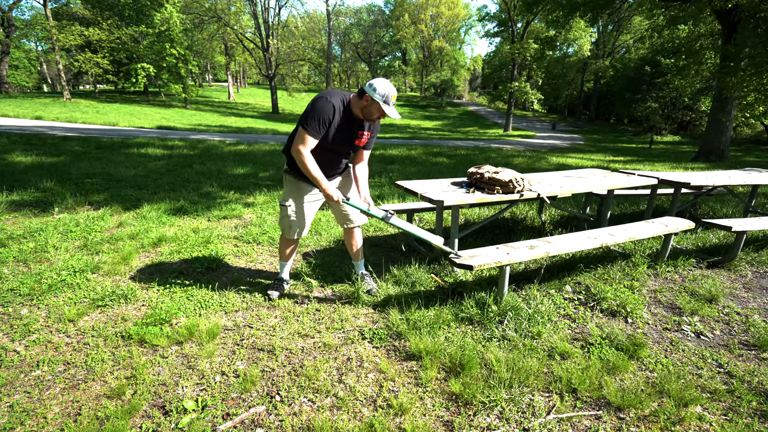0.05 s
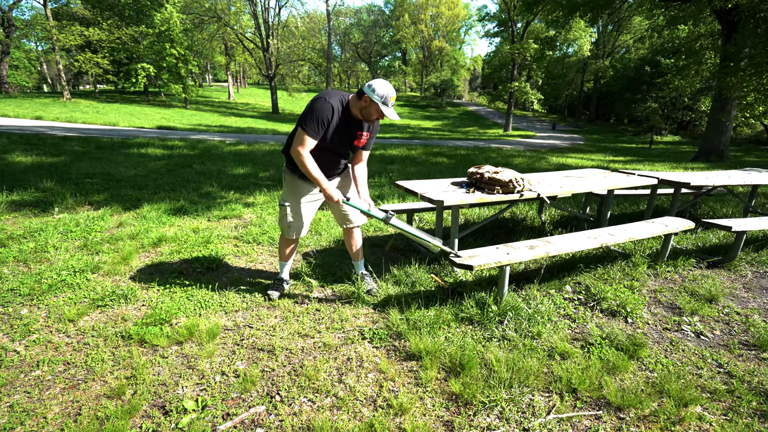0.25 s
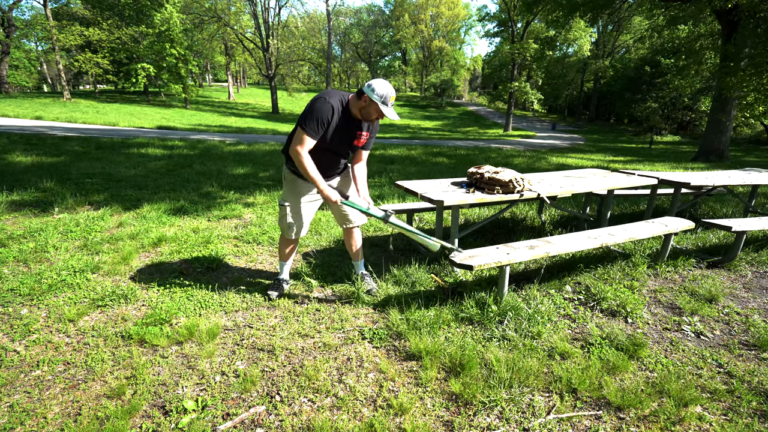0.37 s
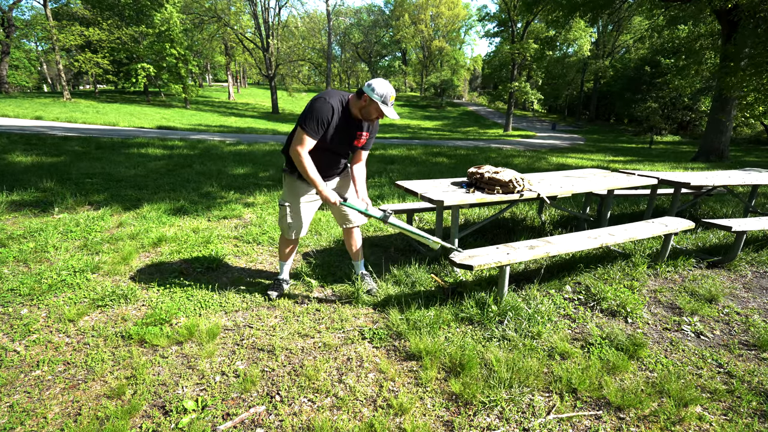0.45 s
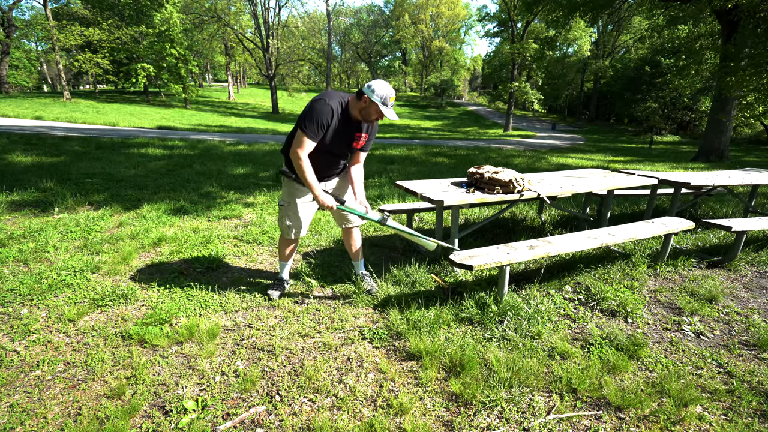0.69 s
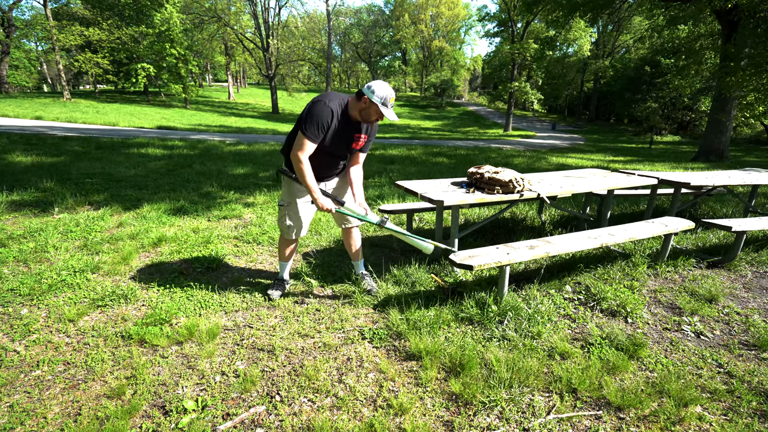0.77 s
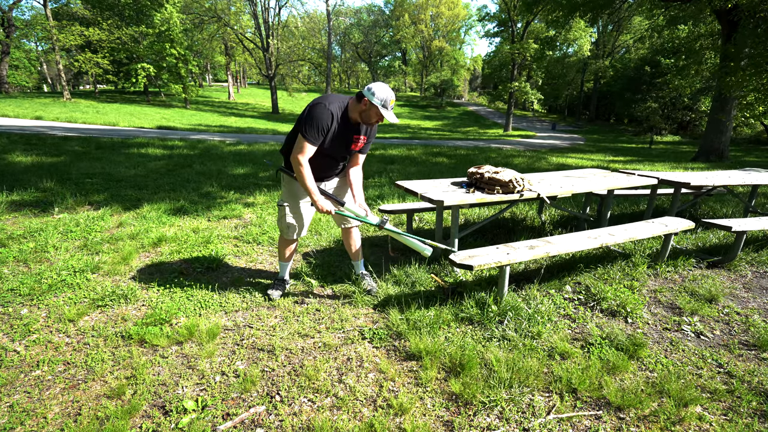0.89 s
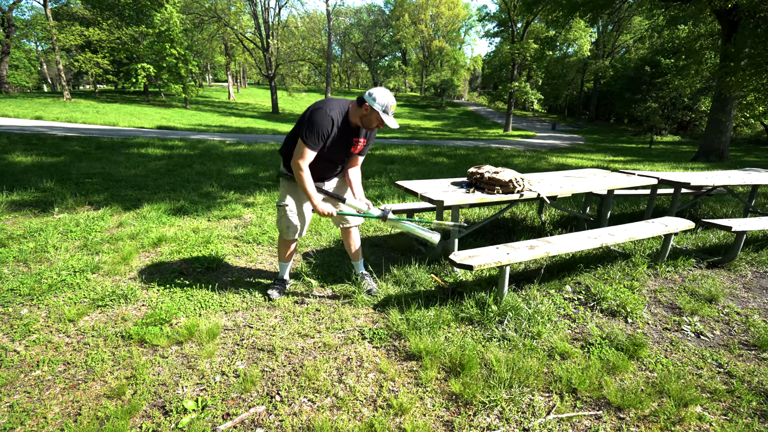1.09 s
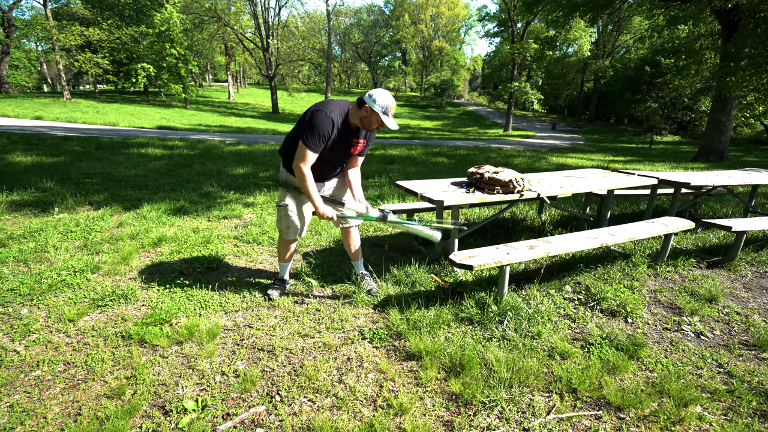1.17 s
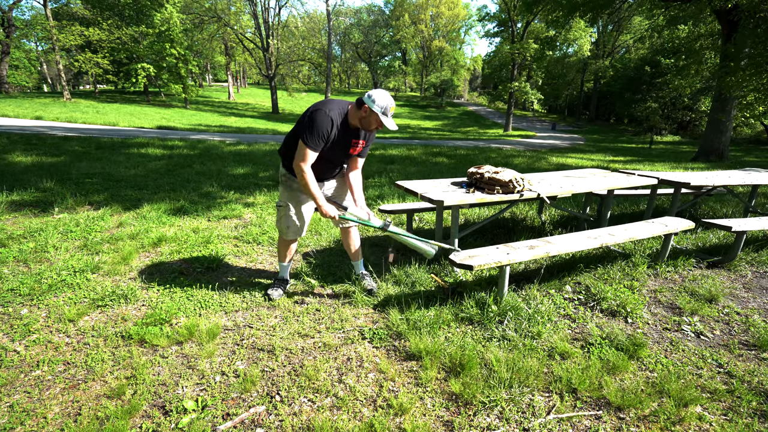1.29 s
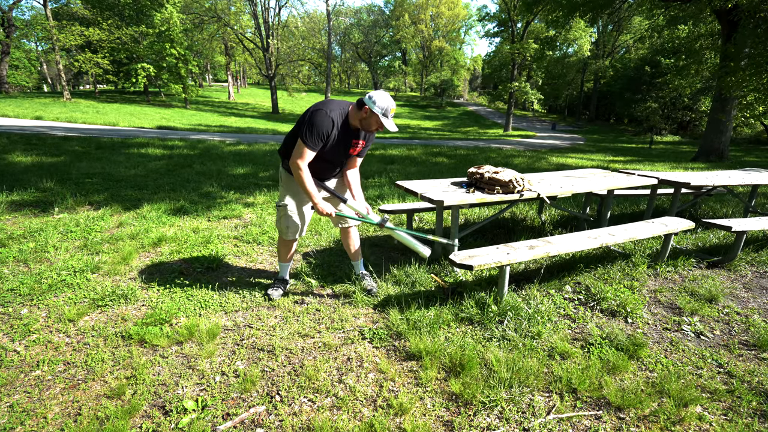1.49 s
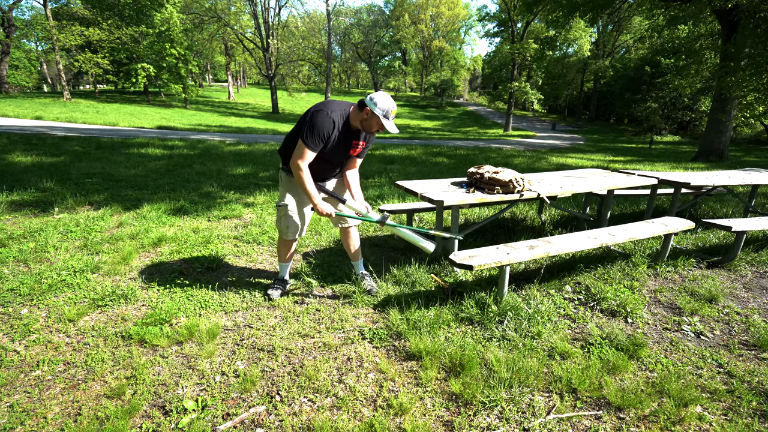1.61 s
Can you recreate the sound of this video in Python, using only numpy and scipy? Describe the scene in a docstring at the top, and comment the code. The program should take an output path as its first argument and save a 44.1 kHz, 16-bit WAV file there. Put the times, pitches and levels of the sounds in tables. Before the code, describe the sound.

Hollow pole sections slide and knock home outdoors, three bright clacks each with a short hollow note, then small ticks and one dull knock, heard from a few metres away with low distant traffic and slight scatter from the trees.

```python
"""Telescoping pole in a quiet park

A telescoping pole is collapsed by hand, a few metres from the microphone, over distant traffic rumble.
Hollow sections scrape, rattle and faintly rustle (dense noise grains) and knock home: decaying wall modes
clack with a burst of noise, then slower-swelling modes of the air in the tube give a short hollow note.
Three knocks are sharp, the last dull; loose sections tick (filtered noise), and the park scatters it all."""
import sys
import numpy as np
from scipy import signal
from scipy.fft import rfft, irfft
from scipy.io import wavfile

SR = 44100
rng = np.random.default_rng(int(sys.argv[2]) if len(sys.argv) > 2 else 0)


def master(y):
    """Save y as 16-bit WAV."""
    cut = np.clip(np.atleast_2d(y).T, -1, 1)
    pcm = np.round(cut * 32767)  # scale
    wavfile.write(sys.argv[1], SR, pcm.astype(np.int16))


N = 72765  # length in samples


def from_db(db):
    """Decibels to gain."""
    return 10 ** (np.asarray(db) / 20)


def rms_one(x):
    """Scale to unit rms."""
    return x / np.sqrt(np.mean(x ** 2) + 1e-20)


def coloured(x, spectrum):
    """Shape noise by a spectrum, interpolated in dB over log frequency; rms 1."""
    hz, db = np.transpose(spectrum)
    bins = np.maximum(np.arange(len(x) // 2 + 1) * SR / len(x), 1)
    gain = from_db(np.interp(np.log(bins), np.log(hz), db))
    return rms_one(irfft(rfft(x) * gain, len(x)))


def low_pass(x, hz):
    """A softer contact loses its treble, by a gentle first-order slope."""
    return signal.sosfilt(signal.butter(1, hz, fs=SR, output="sos"), x)


def add(out, start_s, sound):
    """Mix a sound in at a time."""
    i = int(start_s * SR)
    out[i:i + len(sound)] += sound[:len(out) - i]


def burst(t, spectrum, t60):
    """A brief noise of a given colour that dies away by 60 dB in t60 seconds."""
    noise = coloured(rng.standard_normal(len(t)), spectrum)
    return noise * from_db(-60 * t / t60)


# The park with its distant traffic. Each row: frequency in Hz, level in dB.
PARK_SPECTRUM = [(20, -7), (35, -8.5), (60, -4.5), (96, -1), (127, -7.5), (200, -8.5), (290, -18),
                 (450, -21), (800, -19), (1100, -24.5), (1700, -33), (3200, -41.5), (5000, -47.5),
                 (8700, -48), (11000, -53), (14000, -51.5), (16000, -53)]
PARK_DB = -47


def park_background():
    """Distant traffic rumbles: steady noise, weighted to the bass."""
    return from_db(PARK_DB) * coloured(rng.standard_normal(N), PARK_SPECTRUM)


# Touches of the loose sections. Each row: start in seconds, level in dB, treble cut-off in Hz.
TICKS = [(0.142, -51, 6000), (0.3194, -51.5, 9000), (0.453, -41.5, 8000), (0.7952, -34, 1800),
         (0.8168, -39, 7000), (0.8705, -52.5, 8900), (0.8983, -46.5, 9400), (1.034, -55.5, 6000),
         (1.085, -49, 17000), (1.2018, -55, 8000), (1.215, -58, 8000), (1.225, -56, 7900),
         (1.235, -57, 8000), (1.3368, -42, 6850)]
# Colour of a tick before its cut-off. Each row: frequency in Hz, level in dB.
TICK_SPECTRUM = [(60, -31.5), (300, -12), (1500, 12), (3500, -4), (5500, 3.5), (9000, 2), (11000, -6.5),
                 (16000, -6)]
TICK_T60_S = 0.031


def ticks():
    """Loose sections touch lightly: each contact is a short noise, softened by its own cut-off."""
    out, t = np.zeros(N), np.arange(SR // 10) / SR
    for start_s, db, cutoff_hz in TICKS:
        tick = low_pass(burst(t, TICK_SPECTRUM, TICK_T60_S), cutoff_hz)
        add(out, start_s, from_db(db) * tick)
    return out


SWELL_SHAPE, MODE_SPREAD_DB = 5.6, 1  # steepness of a mode's build-up, spread of its level between blows


def mode(t, hz, db, t60, swell_s):
    """One resonance builds up and dies away, at a slightly different level at every blow."""
    swell = 1 - np.exp(-(t / swell_s) ** SWELL_SHAPE)
    decay = from_db(db + rng.normal(0, MODE_SPREAD_DB) - 60 * t / t60)
    return swell * decay * np.sin(2 * np.pi * hz * t)


# Resonances of the tube wall. Each row: frequency in Hz, level in dB, t60 in seconds, rise in seconds.
WALL_MODES = [(423, -7.5, 0.008, 0.00078), (1335, -18.5, .039, 0.0017), (1819, -9.5, 0.02, 0.0021),
              (2105, -20.5, 0.027, 0.00017), (2524, -19, 0.022, 0.00057), (2884, -15.5, 0.013, 0.002),
              (3157, -18, 0.025, 0.0008), (3824, -30, .025, 0.00073), (4483, -26, 0.018, 0.00087),
              (5320, -26, .024, 0.0013), (5840, -41.5, 0.046, 0.00085), (6760, -31.5, 0.01, 0.0042),
              (9720, -40, .02, 0.00057), (10170, -39.5, 0.036, 0.0024)]
FOCUS_DB, FOCUS_OCTAVES = 7.5, 0.18  # boost at the pitch that a contact favours, and its width


def wall_clack(t, clack_db, focus_hz):
    """The struck wall rings in many short modes, stronger near the pitch that the contact favours."""
    clack = np.zeros(len(t))
    for k, (hz, db, t60, rise_s) in enumerate(WALL_MODES):
        octaves_away = np.log2(hz / focus_hz)
        boost_db = FOCUS_DB * np.exp(-(octaves_away / FOCUS_OCTAVES) ** 2)
        sign = (-1) ** k  # neighbouring modes start in opposite directions
        clack += sign * mode(t, hz, db + clack_db + boost_db, t60, rise_s)
    return clack


# Resonances of the air in the tube. Each row: frequency in Hz, level in dB while extended,
# level in dB when closed, t60 in seconds, swell in seconds.
AIR_MODES = [(222.3, -31.5, -32.5, 0.12, 0.00091), (285.8, -39.5, -46, .25, 0.0043),
             (398.3, -28, -28, 0.16, .001), (450, -37, -39.5, .11, 0.0011),
             (503, -27, -17.5, 0.083, 0.0068), (591, -12, -56, 0.093, .0033),
             (613, -8, -15.5, 0.083, 0.012), (702.4, 3, -3, 0.055, 0.00957),
             (757.9, -3.5, 2.5, 0.072, 0.011), (1028, -18, -36.5, 0.059, 0.0074),
             (1066, -17, -33, 0.03, 0.0013), (1182.6, -10, -10.5, 0.051, .0046),
             (1246, -21, -19, .1, 0.0025), (1469, -18.5, -20.5, 0.048, 0.0059),
             (1626, -28.5, -22.5, 0.063, 0.0098)]


def hollow_note(t, note_db, closed):
    """The air in the tube swells into a note; its balance of modes shifts as the tube closes."""
    note = np.zeros(len(t))
    for hz, open_db, closed_db, t60, swell_s in AIR_MODES:
        balance_db = open_db + closed * (closed_db - open_db)
        note += mode(t, hz, note_db + balance_db, t60, swell_s)
    return note


# Colour of the crack in a knock. Each row: frequency in Hz, level in dB.
CRACK_SPECTRUM = [(60, -40), (300, -16), (1500, 10.5), (3200, -8.5), (4000, -7), (6000, -8.5), (9000, -9),
                  (11000, -32), (13500, -12), (16000, -29)]
# Colour of the snap, the first instant of contact. Each row: frequency in Hz, level in dB.
SNAP_SPECTRUM = [(60, -46), (3000, 8), (9000, 10), (11000, 3.5), (13500, 9), (16000, 3)]
CRACK_T60_S, SNAP_T60_S = 0.047, 0.011


def snap_and_crack(t, crack_db, snap_db):
    """The contact's own noise: a very short bright snap over a longer crack."""
    crack = from_db(crack_db) * burst(t, CRACK_SPECTRUM, CRACK_T60_S)
    snap = from_db(snap_db) * burst(t, SNAP_SPECTRUM, SNAP_T60_S)
    return crack + snap


# Sections knocking home. Each row: start in seconds, wall clack in dB, hollow note in dB, crack in dB,
# snap in dB, contact cut-off in Hz, favoured pitch in Hz, how far the tube is closed from 0 to 1.
KNOCKS = [(0.2402, -1, -0.5, -21, -23, 12000, 2050, 0.01), (0.4811, 1, 2.24, -22, -26.5, 5500, 2830, 0.09),
          (0.7478, -4.5, -1, -26, -23, 7900, 2970, 0.01), (1.2955, -16, -0.5, -27.5, -40, 3600, 1300, 0.97)]


def knocks():
    """Each section hits its stop; the contact's softness dulls the wall and noise but not the air."""
    out, t = np.zeros(N), np.arange(SR // 4) / SR
    for start_s, wall_db, air_db, crack_db, snap_db, contact_hz, focus_hz, closed in KNOCKS:
        wall = wall_clack(t, wall_db, focus_hz)
        air = hollow_note(t, air_db, closed)
        noise = snap_and_crack(t, crack_db, snap_db)
        add(out, start_s, low_pass(wall + noise, contact_hz) + air)
    return out


# Scrapes of section in section, rattles after knocks and a faint long rustle. Each row: start in seconds,
# length in seconds, initial level in dB, change of level over the length in dB.
SCRAPES = [(0.249, 0.13, -56, -5.5), (0.441, 0.045, -40.5, 7), (.492, 0.026, -32, -7.5),
           (.53, 0.088, -54, -5.5), (0.682, 0.049, -51, 0), (.701, 0.012, -35, -8),
           (0.758, 0.018, -40.5, 9), (0.795, 0.39, -59, -11.5), (1.308, 0.035, -47.5, 1)]
# Colour of the grains. Each row: frequency in Hz, level in dB.
SCRAPE_SPECTRUM = [(50, -25), (170, -7), (400, 10), (1300, 4.5), (2000, -1.5), (3300, -4), (5000, -13),
                   (9000, -16.5), (11000, -27.5), (16000, -28)]
SCRAPE_EDGE_S = 0.007  # fade at each end
GRAINS_PER_S, GRAIN_SPREAD_DB = 2200, 2


def scrapes_and_rattles():
    """Scrapes, rattles after knocks and a faint long rustle: dense tiny noise grains that swell, fade or hold."""
    t = np.arange(N) / SR
    grain_happens = rng.random(N) < GRAINS_PER_S / SR
    grain_sign = rng.choice([-1, 1], N)
    grain_gain = from_db(GRAIN_SPREAD_DB * np.minimum(rng.exponential(1, N), 3))
    grains = grain_happens * grain_sign * grain_gain
    level = np.zeros(N)
    for start_s, length_s, db, swell_db in SCRAPES:
        end_s = start_s + length_s + SCRAPE_EDGE_S
        edges = np.clip(np.minimum(t - start_s, end_s - t) / SCRAPE_EDGE_S, 0, 1)
        progress = np.clip((t - start_s) / length_s, 0, 1)
        level += edges * from_db(db + swell_db * progress)
    return level * coloured(grains, SCRAPE_SPECTRUM)


# Colour of the scatter from ground and tables. Each row: frequency in Hz, level in dB.
NEAR_SPECTRUM = [(60, -3.5), (280, 6.5), (500, 9.5), (750, 1), (950, 6), (2000, -4.5), (3200, -6),
                 (5000, -0.5), (9000, 1), (16000, -7.5)]
# Colour of the scatter from the trees. Each row: frequency in Hz, level in dB.
TREE_SPECTRUM = [(60, -17.5), (280, -3.5), (500, -3.5), (750, -4), (950, -3.5), (2000, -3), (3200, -2),
                 (5000, 2), (9000, -13), (16000, -20)]
NEAR_DB, NEAR_T60_S = -17.5, 0.15
TREE_DB, TREE_T60_S = -32.5, 0.83
SCATTER_DELAY_S = 0.0088


def surroundings(pole):
    """A short scatter from ground and tables and a fainter, longer one from the trees: dying noise tails."""
    t = np.arange(SR // 2) / SR
    near = burst(t, NEAR_SPECTRUM, NEAR_T60_S)
    trees = burst(t, TREE_SPECTRUM, TREE_T60_S)
    tail = from_db(NEAR_DB) * near / np.linalg.norm(near)  # unit energy before its level
    tail += from_db(TREE_DB) * trees / np.linalg.norm(trees)
    out = np.zeros(N)
    add(out, SCATTER_DELAY_S, signal.fftconvolve(pole, tail))
    return out


def scene():
    """The pole, its scatter and the park's background, as one channel."""
    pole = knocks() + scrapes_and_rattles() + ticks()
    scatter = surroundings(pole)
    return (pole + scatter + park_background())[None]


CUTOFF_HZ = 15900


def record(dry):
    return signal.sosfilt(signal.ellip(10, 0.2, 90, CUTOFF_HZ, fs=SR, output="sos"), dry)


dry = scene()
out = record(dry)
master(out)
```